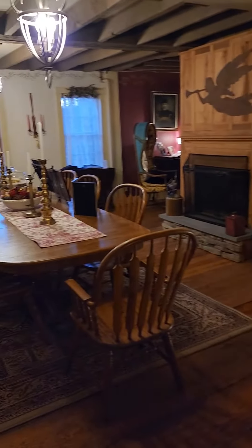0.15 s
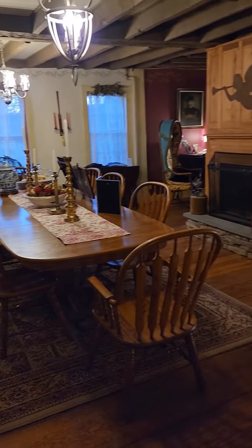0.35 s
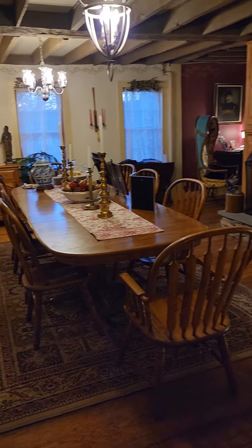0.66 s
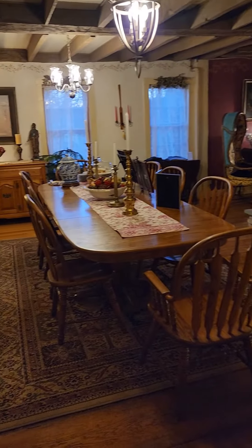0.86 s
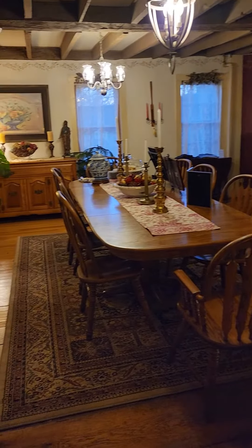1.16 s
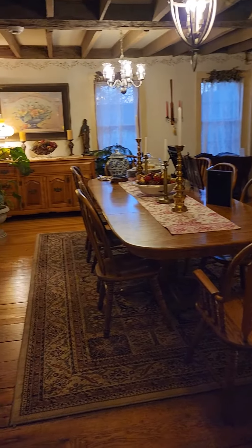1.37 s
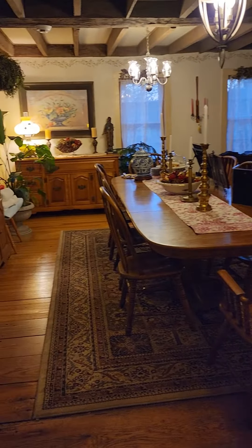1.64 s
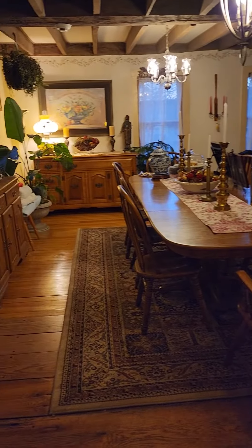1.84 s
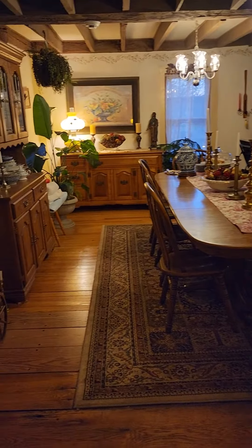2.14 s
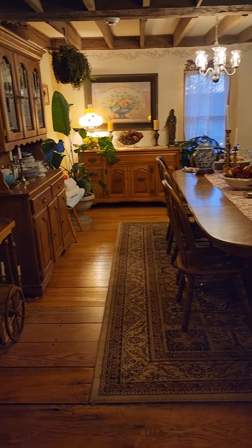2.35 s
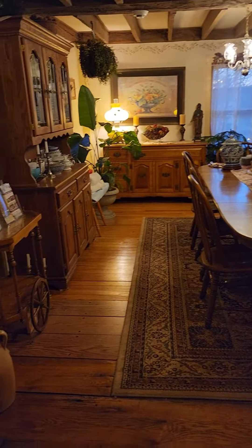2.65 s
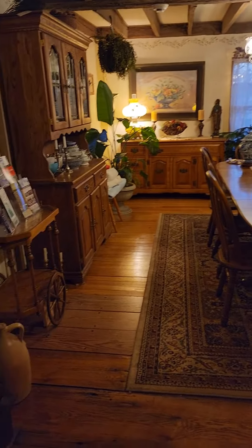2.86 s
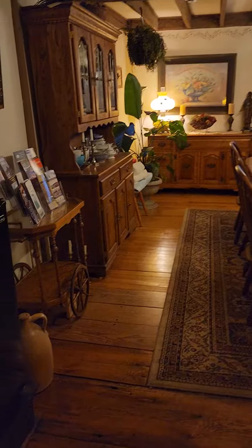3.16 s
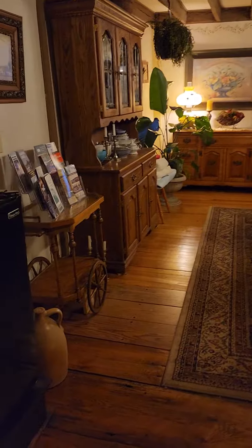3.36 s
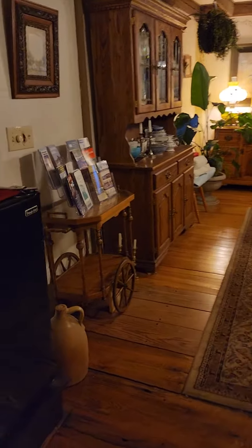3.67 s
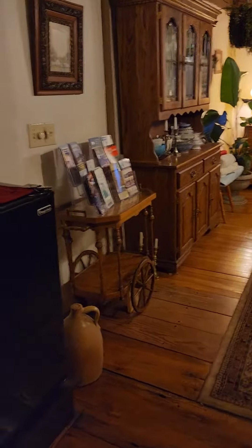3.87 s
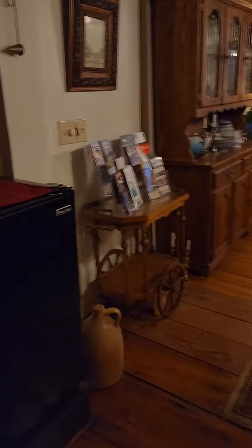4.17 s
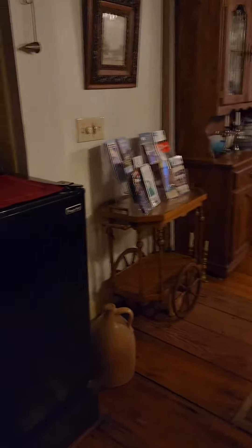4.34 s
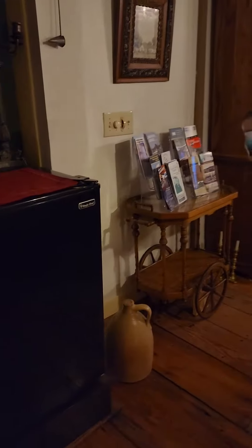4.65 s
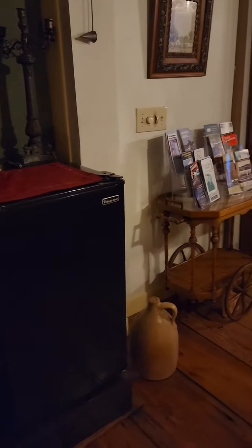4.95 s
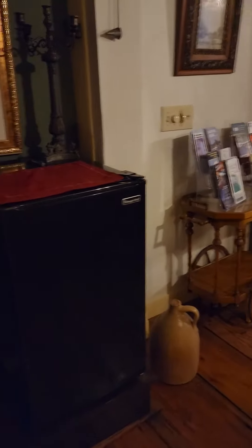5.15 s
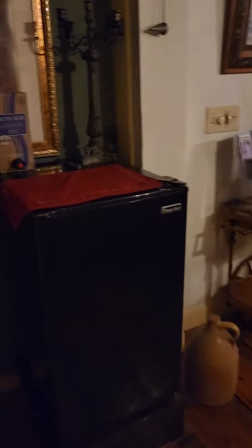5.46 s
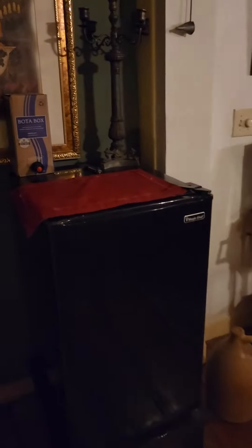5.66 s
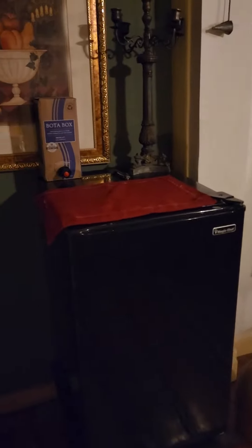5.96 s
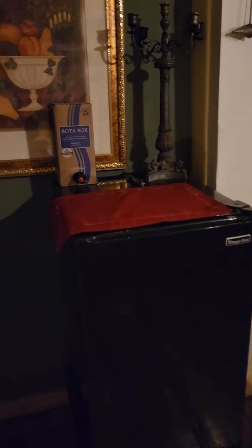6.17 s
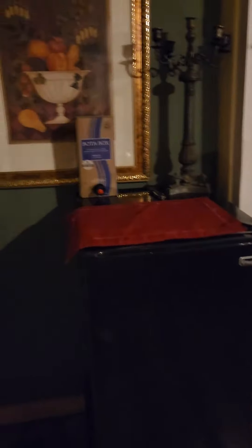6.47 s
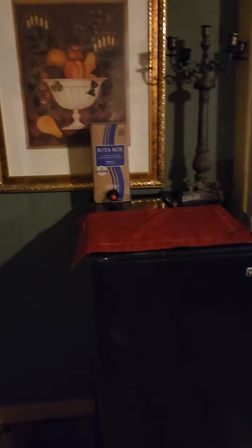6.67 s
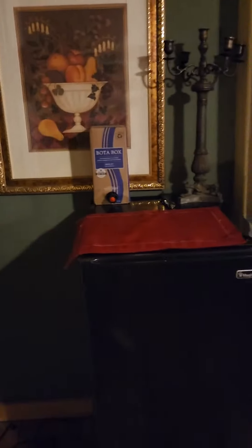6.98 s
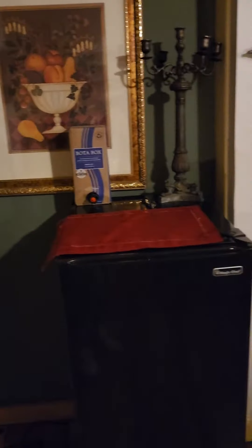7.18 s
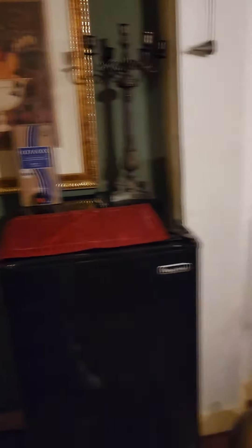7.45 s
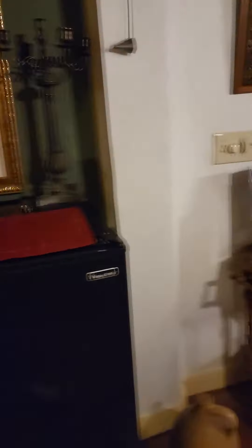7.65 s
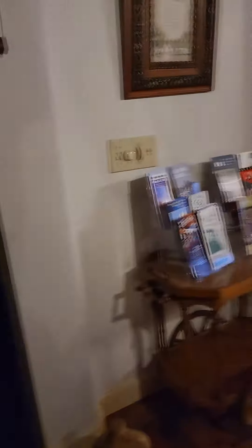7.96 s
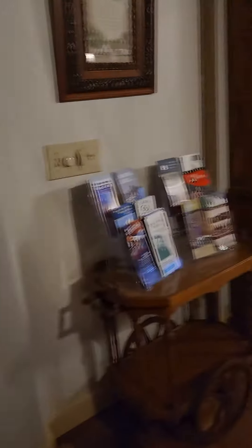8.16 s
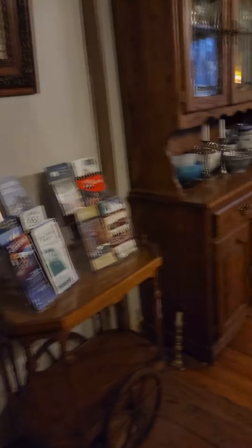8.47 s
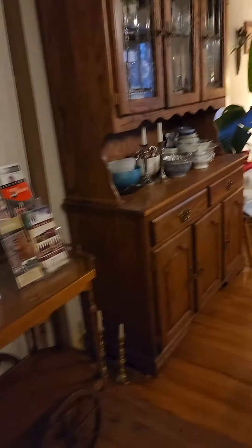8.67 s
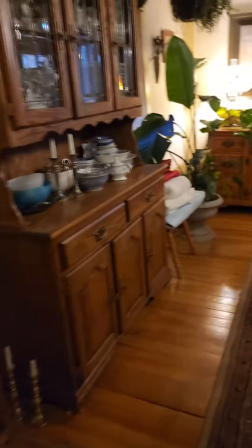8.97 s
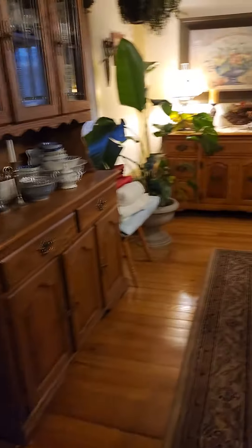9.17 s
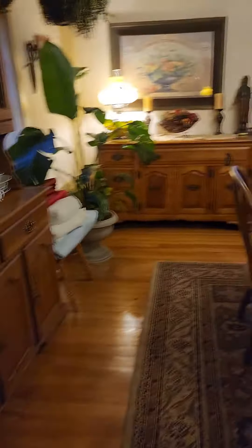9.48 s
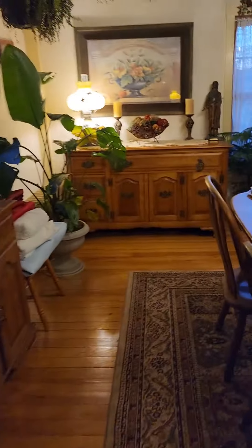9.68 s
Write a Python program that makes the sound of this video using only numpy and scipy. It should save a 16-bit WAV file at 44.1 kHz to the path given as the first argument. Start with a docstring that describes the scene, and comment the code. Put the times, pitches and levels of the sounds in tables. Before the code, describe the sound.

A hand-held microphone follows a slow walk through a quiet, low-ceilinged room with a faint appliance hum. Sharp wooden cracks and a few footfalls come first, then a pause. Uneven steps continue on the old boards, each a low thud with a hollow knock and a gritty clack. Planks creak and groan, soles drag and clothing brushes, and glassware clinks very faintly just after the heaviest step near the end.

```python
"""A furnished, low-ceilinged room with old wide floorboards, heard from a hand-held stereo microphone.
Someone walks slowly. Stuck joints snap dryly under the first shift of weight; then each step thuds the
floor, knocks a plank and clacks on grit, while soles scuff, joists heave and slipping joints creak.
Clothes rustle, glassware clinks once, and an appliance hums faintly in the background."""
import sys
import numpy as np
from scipy import signal
from scipy.fft import rfft, irfft, next_fast_len
from scipy.io import wavfile
from scipy.ndimage import uniform_filter1d

SR = 44100
rng = np.random.default_rng(int(sys.argv[2]) if len(sys.argv) > 2 else 0)


def generate_wav(signal):
    """Clip the signal to [-1, 1] and save it as 16-bit WAV at the path in sys.argv[1]."""
    frames = np.transpose(np.atleast_2d(signal))
    scaled = np.clip(frames, -1, 1) * 32767
    pcm = np.round(scaled).astype(np.int16)
    wavfile.write(sys.argv[1], SR, pcm)


N = 433062
TIME = np.arange(N) / SR
HIT_TIME = np.arange(SR * 2 // 3) / SR

# Event levels are given before the trims in each source's function.
# the room's decay: (frequency [Hz], t60 [s])
ROOM_DECAY = [(100, 0.51), (300, 0.35), (1000, 0.41), (2500, 0.31), (6000, 0.25), (10000, 0.2),
              (16000, 0.094)]
# likeness of left and right at the microphone: (frequency [Hz], coherence [0-1])
COHERENCE = [(60, 1), (130, 0.88), (290, 0.9), (640, 0.13), (1300, 0), (3000, 0), (15000, 0)]
# still air in the room: (frequency [Hz], density [dB])
AIR_SPECTRUM = [(20, -1), (40, -0.5), (90, -1.5), (250, -6), (450, -8), (700, -17.5), (1200, -20),
                (2400, -24.5), (3500, -31.5), (5500, -31.5), (6500, -38), (8200, -33.5), (10300, -58),
                (15500, -46)]

# weight moving onto another board: (start [s], length [s], joist heave [dB], board groan [dB])
WEIGHT_SHIFTS = [(0, 0.19, -71, -56.5), (.52, 0.42, -58.5, -58.5), (1.09, 0.2, -60.5, -57.5),
                 (3.487, 0.071, -56, -74), (4.187, 0.11, -50, -50.5), (4.873, 0.48, -64, -57.5),
                 (5.935, 0.34, -54, -48), (6.598, 0.47, -53, -49), (7.08, 0.62, -60, -49),
                 (7.85, .48, -60, -47), (8.617, .3, -46, -54.5), (9.197, 0.11, -45, -55),
                 (9.575, 0.099, -48.5, -55), (9.657, 0.14, -62, -47)]
# heaving joists: (frequency [Hz], density [dB])
HEAVE_SPECTRUM = [(22, -5.5), (37, -7.5), (48, 2.5)]
# groaning boards: (frequency [Hz], density [dB])
GROAN_SPECTRUM = [(75, 1), (130, -0.5), (190, -9), (300, -3), (440, -8), (560, -12)]

# a leg swings and its sole drags: (start [s], length [s], sole [dB], clothes [dB])
LEG_SWINGS = [(4.15, 0.11, -72, -69), (4.783, 0.25, -63.5, -78), (6.103, 0.2, -62, -71),
              (6.695, 0.76, -63.5, -74), (7.23, 0.27, -52, -62.5), (7.358, 0.073, -47.5, -59.5),
              (7.507, .13, -56, -62.5), (7.841, 0.39, -46, -60), (8.316, 0.15, -60, -64),
              (8.667, 0.12, -49, -57), (8.822, 0.32, -62.5, -62), (9.217, .1, -61, -68),
              (9.32, 0.055, -49, -59.5), (9.46, 0.028, -49.5, -60), (9.747, 0.054, -48.5, -71)]
# a sole sliding on wood: (frequency [Hz], density [dB])
SCUFF_SPECTRUM = [(250, 7.5), (480, 7), (750, 1.5), (1300, -1.5), (2200, -5), (3300, -11.5), (5000, -15.5)]
# brushing clothes: (frequency [Hz], density [dB])
CLOTH_SPECTRUM = [(3500, -0.5), (6000, -1), (6800, 3), (7700, 6), (8700, -0.5), (10300, -17), (12500, -9),
                  (15500, -13)]

# modes of a small piece of glassware: (frequency [Hz], level [dB], t60 [s])
GLASS_RING = [(8050, -6, 0.13), (11100, -6, 0.33), (12700, -10, 0.18), (15400, -17, 0.14)]
# joints slipping once or in a run: (time [s], length [s], level [dB], resonance [Hz], t60 [cycles])
JOINT_CREAKS = [(1.464, .002, -68, 1690, 8.1), (3.795, 0.025, -58, 2470, 1.4),
                (3.931, .004, -78.5, 7400, 7.6), (4.37, .008, -63, 5200, 7.7), (4.836, .002, -55, 1970, 17),
                (4.87, 0.26, -71, 2140, 12), (4.95, .12, -55, 980, 2.7), (7.962, 0.065, -51, 1900, 4.2),
                (9.589, .002, -60.5, 1770, 4.4)]
# dry snaps of a loaded board: (time [s], crack [dB], ping [dB])
BOARD_SNAPS = [(0.0183, -38.5, -37), (0.155, -42, -41), (0.4357, -39, -39.5), (0.526, -44, -43),
               (0.5941, -43.5, -47), (0.6433, -44.5, -50)]
# cracking wood: (frequency [Hz], density [dB])
CRACK_SPECTRUM = [(280, -2.5), (700, -4.5), (1100, -2.5), (1700, 1.5), (2800, -3), (4000, -5.5), (5500, -4),
                  (7500, -11), (10000, -15), (15500, -15)]

# foot contacts: (time [s], floor thud [dB], plank knock [dB], sole clack [dB], grit [dB], roll [s])
FOOT_CONTACTS = [(0.347, -62, -59.5, -73, -86, 0.0044), (0.521, -40.5, -47, -72, -64, 0.0066),
                 (0.65, -47, -44.5, -45, -67, 0.0033), (1.095, -63, -54, -58, -71, 0.0029),
                 (1.207, -50, -49.5, -51, -61, .004), (1.503, -62, -49.5, -51.5, -57.5, .004),
                 (3.307, -55, -43, -63, -95, 0.0027), (3.641, -60, -53.5, -59.5, -88, 0.0066),
                 (3.705, -54.5, -52.5, -48, -49, 0.0051), (4.229, -51, -43, -50, -51, 0.0052),
                 (4.567, -75, -62, -57, -71, 0.0032), (5.128, -60, -60, -57.5, -64, 0.0034),
                 (5.176, -43, -45, -58.5, -72, .012), (5.241, -45, -41, -50.5, -60.5, 0.0058),
                 (5.486, -63, -58.5, -80, -75, .006), (5.615, -73, -53, -67, -71, 0.003),
                 (5.77, -80, -61, -77, -84, 0.0035), (5.954, -54, -49, -58, -59.5, 0.0032),
                 (6.03, -51, -47.5, -54.5, -69.5, .007), (6.149, -65, -43, -52.5, -57, 0.0051),
                 (6.208, -46, -44, -49, -51, 0.0023), (6.31, -46, -44.5, -51, -58, 0.0052),
                 (6.515, -46, -46.5, -64, -78, .005), (6.611, -52, -46.5, -54.5, -65, 0.0037),
                 (6.755, -47.5, -53.5, -59.5, -71, .005), (6.824, -37.5, -38, -58, -74, .005),
                 (6.835, -62, -39, -44, -52.5, 0.01), (6.971, -44, -51, -50, -58, 0.015),
                 (7.009, -58, -40, -46.5, -53, 0.0068), (7.108, -58, -48, -48.5, -58, 0.0048),
                 (7.197, -59, -45, -46.5, -56, 0.0082), (7.268, -50, -44, -45.5, -58, 0.0055),
                 (7.465, -41, -43, -47.5, -68, .012), (7.505, -42, -38.5, -42.5, -51, 0.0027),
                 (7.689, -64, -40, -43, -57, 0.0021), (7.791, -46.5, -48.5, -51, -90, 0.0071),
                 (8.16, -28, -34.5, -44, -54.5, 0.0035), (8.269, -64, -52, -53.5, -64, 0.0033),
                 (8.479, -68, -52, -64, -65, 0.0031), (8.595, -38.5, -37.5, -45, -55.5, 0.0023),
                 (8.689, -34, -35, -45.5, -58, 0.0045), (8.73, -38, -38, -46.5, -64, 0.011),
                 (9.044, -74, -82, -59.5, -62, 0.0041), (9.311, -52, -53, -58, -69, 0.0055),
                 (9.36, -48.5, -46.5, -56.5, -67, 0.01), (9.68, -58, -45.5, -61, -67.5, .012),
                 (9.698, -52, -40, -64, -72, 0.0048), (9.74, -55, -39, -56.5, -72, 0.0089)]
# modes of the floor on its joists: (nominal frequency [Hz], level [dB], t60 [s])
FLOOR_RING = [(76.7, -2, .22), (107.4, -7, 0.22), (115.8, 3, 0.16), (155.8, 1, 0.28), (180.4, -6, 0.24)]
# modes of a single plank: (nominal frequency [Hz], level [dB], t60 [s])
PLANK_RING = [(207.7, -2, 0.059), (277.7, -2, 0.071), (337, -1.5, 0.074), (431.5, -0.5, 0.052),
              (526, -2.5, 0.037), (630, 0, 0.012), (830, -4.5, 0.013), (1178, -2, 0.01)]
# a sole striking wood: (frequency [Hz], density [dB])
SOLE_SPECTRUM = [(600, 2.5), (1200, 4), (2100, 0.5), (3200, -6.5), (4800, -12)]
# grit underfoot: (frequency [Hz], density [dB])
GRIT_SPECTRUM = [(3300, -6), (5200, 6.5), (7300, 11.5), (8700, 7), (10200, -10), (12000, -0.5),
                 (15500, -4.5)]


def amp(db):
    """Decibels to gain."""
    return 10 ** (np.asarray(db) / 20)


def lookup(points, hz):
    """A table's value at hz, interpolated on a log-frequency axis."""
    frequency, value = np.transpose(points)
    return np.interp(np.log(hz + 1), np.log(frequency), value)


def spectrum(points, hz):
    """Gain of a spectrum table, falling away steeply beyond its ends."""
    octaves_outside = abs(np.log2((hz + 1) / np.clip(hz + 1, points[0][0], points[-1][0])))
    return amp(lookup(points, hz) - np.minimum(20 * octaves_outside, 80))


def place(mix, start_s, hit, db):
    """Mixes in a stereo hit, scaled so that its loudest 20 ms have an rms level of db."""
    peak_power = uniform_filter1d((hit ** 2).mean(0), 880, mode="constant").max()
    part = mix[:, max(round(start_s * SR), 0):][:, :hit.shape[1]]
    part += hit[:, :part.shape[1]] * amp(db) / np.sqrt(peak_power + 1e-20)


def through(x, response):
    """Convolution, cut to the length of one hit."""
    return signal.fftconvolve(np.atleast_2d(x), np.atleast_2d(response), axes=1)[:, :len(HIT_TIME)]


def lowpass(x, hz):
    """Softens the treble above hz."""
    return signal.sosfilt(signal.butter(2, hz, fs=SR, output="sos"), x)


def colour(points, size=2048):
    """The causal impulse response of a spectrum."""
    log_gain = np.log(spectrum(points, abs(np.fft.fftfreq(size, 1 / SR))))
    minimum_phase = np.exp(np.conj(signal.hilbert(log_gain)))
    return np.fft.ifft(minimum_phase).real[:size // 2]


def ring(modes, tuning=1):
    """Dying sines of a struck object; the spot that is struck sets each one's sign."""
    return sum(rng.choice([-1, 1]) * amp(db - 60 * HIT_TIME / t60)
               * np.sin(2 * np.pi * hz * tuning * HIT_TIME) for hz, db, t60 in modes)


def noise(count, points=None):
    """Stereo noise of rms 1, alike in both channels in the bass."""
    size = next_fast_len(count)
    hz = np.fft.rfftfreq(size, 1 / SR)
    coherence = np.clip(lookup(COHERENCE, hz), -1, 1)
    mid, side = rfft(rng.standard_normal((2, size))) * np.sqrt([1 + coherence, 1 - coherence])
    gain = spectrum(points, hz) if points else 1
    x = irfft(np.array([mid + side, mid - side]) * gain, size)[:, :count]
    return x / x.std()


def wander(depth_db, samples):
    """An uneven, smoothly wandering gain of rms 1."""
    drift = uniform_filter1d(uniform_filter1d(rng.standard_normal(N), samples), samples // 2)
    gain = amp(depth_db * drift / drift.std())
    return gain / np.sqrt(np.mean(gain ** 2))


def swell(start, length, attack_s, release_s):
    """Attack, hold and a dying release, as a gain for every sample."""
    age = TIME - start
    return np.clip(age / attack_s, 0, 1) * np.exp(-np.clip((age - length) / release_s, 0, 20))


def contact(roll_s, per_s, crunch, channels=2):
    """A first touch, then a shower of tiny ones that swells and dies as the pressure spreads."""
    shape, age = (channels, len(HIT_TIME)), HIT_TIME / max(roll_s, 1e-4)
    grains = rng.standard_normal(shape) * (rng.random(shape) < per_s / SR)
    grains *= np.sqrt(age) * np.exp(-age)
    force = crunch * grains / (np.linalg.norm(grains, axis=1, keepdims=True) + 1e-9)
    force[:, 0] -= 1  # the first touch
    return force


def room_echo(build_s=0.0016):
    """The room's echo from one spot on the floor; the treble dies first."""
    hz, age, bands = signal.stft(noise(len(HIT_TIME)), SR, nperseg=256)
    decay = amp(-60 * age / lookup(ROOM_DECAY, hz)[:, None])
    tail = signal.istft(bands * decay, SR, nperseg=256)[1][:, :len(HIT_TIME)]
    tail *= 1 - np.exp(-HIT_TIME / build_s)
    return tail / np.linalg.norm(tail[0])


def at_mic(x, echo, wet_db, lag=18):
    """Direct sound, reaching the farther, left side of the microphone lag samples late, plus echo."""
    left, right = np.broadcast_to(x, echo.shape)
    direct = np.array([np.pad(left, (lag, 0))[:len(right)], right])
    return direct + amp(wet_db) * through(x, echo)


def room_tone(hum_hz=60.1, hum_db=-62.5, air_db=-64.5):
    """The background: a wavering appliance hum in still air."""
    hum = np.sqrt(2) * np.sin(2 * np.pi * hum_hz * TIME) * wander(depth_db=1.5, samples=6000)
    return amp(hum_db) * hum + amp(air_db) * noise(N, AIR_SPECTRUM)


def floor_rumble(heave_trim_db=-1, groan_trim_db=-2):
    """Joists heave and boards groan as the weight moves onto them, then settle."""
    joist_load, board_load = np.zeros((2, N))
    for start, length, joist_db, board_db in WEIGHT_SHIFTS:
        load = swell(start, length, attack_s=0.05, release_s=0.092)
        joist_load = np.maximum(joist_load, amp(joist_db + heave_trim_db) * load)
        board_load = np.maximum(board_load, amp(board_db + groan_trim_db) * load)
    return noise(N, HEAVE_SPECTRUM) * joist_load + noise(N, GROAN_SPECTRUM) * board_load


def glass_clink(time_s=8.377, db=-63):
    """The shaking floor makes two pieces of glassware touch."""
    out = np.zeros((2, N))
    place(out, time_s, at_mic(ring(GLASS_RING), room_echo(), wet_db=-2), db)
    return out


def scuff_and_rustle(cloth_trim_db=-3, walking_from_s=2.72, attack_s=0.028):
    """As a leg swings, the sole drags with an uneven, gritty grip and the clothes brush and crinkle."""
    drag = np.zeros(N)
    # once the walker is under way, the clothes keep brushing softly between swings
    brush = amp(-80.5) * np.clip((TIME - walking_from_s) / attack_s, 0, 1)
    for start, length, sole_db, clothes_db in LEG_SWINGS:
        speed = swell(start, length, attack_s, release_s=0.081)
        drag = np.maximum(drag, amp(sole_db) * speed)
        brush = np.maximum(brush, amp(clothes_db) * speed)
    scuff = noise(N, SCUFF_SPECTRUM) * drag * wander(2.5, samples=600) * wander(1.1, samples=60)
    rustle = noise(N, CLOTH_SPECTRUM) * brush * wander(1.5, samples=700) * wander(2, samples=40)
    return scuff + amp(cloth_trim_db) * rustle


def joint_creaks(typical_slips_per_s=170):
    """A joint sticks and slips unevenly; each slip rings the wood for a few cycles."""
    out, count = np.zeros((2, N)), len(HIT_TIME)
    for start, length, db, hz, cycles in JOINT_CREAKS:
        jitter = np.repeat(rng.standard_normal(count), 200)[:count]
        slip_rate = typical_slips_per_s * np.exp(0.43 * jitter)
        slips = np.diff(np.floor(np.cumsum(slip_rate) / SR), prepend=-1)
        force = slips * (HIT_TIME < length) * rng.uniform(0.18, 1, count)
        wood = lowpass(np.gradient(ring([(hz, 0, cycles / hz)])), hz=min(0.7 * hz, SR / 3))
        place(out, start, at_mic(through(force, wood), room_echo(), wet_db=-5), db)
    return out


def board_snaps(first_trim_db=-3, second_trim_db=-4, ping_trim_db=2.5, slip_s=0.0046):
    """A stuck joint cracks, then slips home with a second crack and a short bright ping."""
    out, wood = np.zeros((2, N)), colour(CRACK_SPECTRUM)
    for start, crack_db, ping_db in BOARD_SNAPS:
        echo = room_echo()
        first = through(contact(0.0014, per_s=8900, crunch=3.1), wood)
        second = through(contact(0.00078, per_s=9000, crunch=0.4), wood)
        tap = contact(0.00057, per_s=9300, crunch=0.93)
        ping = through(tap, ring([(7100, 0, 0.0039), (5400, -6, 0.002)]))
        place(out, start, at_mic(first, echo, wet_db=1), crack_db + first_trim_db)
        # channels swapped: the slip reaches the left first
        place(out, start + slip_s, at_mic(second, echo, wet_db=-7)[::-1], crack_db + second_trim_db)
        place(out, start + slip_s, at_mic(ping, echo, wet_db=-20, lag=22)[::-1], ping_db + ping_trim_db)
    return out


def footsteps(thud_trim_db=-1, tuning_spread=0.036, flat_s=0.023, first_touch_s=0.0018):
    """Each contact pushes the whole floor, rings a plank and clacks the sole on gritty wood."""
    out, sole, grit = np.zeros((2, N)), colour(SOLE_SPECTRUM), colour(GRIT_SPECTRUM)
    for start, thud_db, knock_db, clack_db, grit_db, roll_s in FOOT_CONTACTS:
        echo = room_echo()
        floor_tuning, plank_tuning = np.exp(tuning_spread * rng.standard_normal(2))  # no two ring alike
        # heel to toe: the rest of the foot lands flat a moment later, softer
        for delay, thud_drop_db, knock_drop_db in [(0, 0, 0), (flat_s, -5.5, -9.5)]:
            push = contact(roll_s, per_s=900, crunch=0.43, channels=1)
            # a yielding heel passes no treble to the wood
            floor = lowpass(ring(FLOOR_RING, floor_tuning), hz=352)
            plank = lowpass(through(push, ring(PLANK_RING, plank_tuning)), hz=1390)
            thud = at_mic(floor, echo, wet_db=-9, lag=6)
            knock = at_mic(plank, echo, wet_db=-1, lag=12)
            place(out, start + delay, thud, thud_db + thud_trim_db + thud_drop_db)
            place(out, start + delay, knock, knock_db + knock_drop_db)
        crunch = roll_s / first_touch_s  # the longer the roll, the less the first touch stands out
        clack = through(contact(roll_s, per_s=2500, crunch=crunch), sole)
        grind = through(contact(roll_s, per_s=1800, crunch=crunch), grit)
        place(out, start, at_mic(clack, echo, wet_db=0.5), clack_db)
        place(out, start, at_mic(grind, echo, wet_db=-0.5), grit_db)
    return out


def scene():
    """The walk and the room at the microphone, a little louder on the right."""
    hits = footsteps() + board_snaps() + joint_creaks() + glass_clink()
    return (hits + scuff_and_rustle() + floor_rumble() + room_tone()) * amp([[-0.5], [0.5]])


def record(dry):
    """The recorder's band limit."""
    band_limit = signal.firwin(255, cutoff=16100, window=("kaiser", 8), fs=SR)
    return signal.oaconvolve(dry, band_limit[None], "same", axes=1)


dry = scene()
out = record(dry)
generate_wav(out)
```